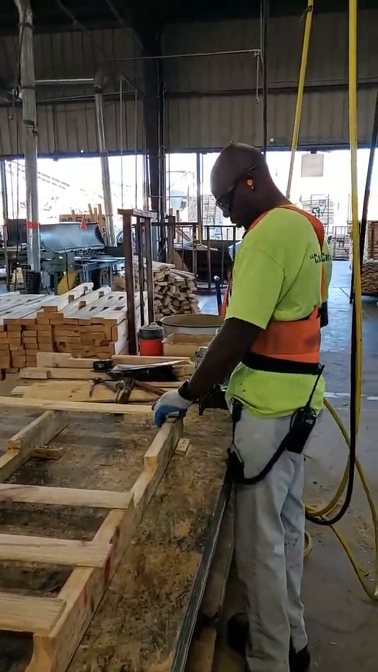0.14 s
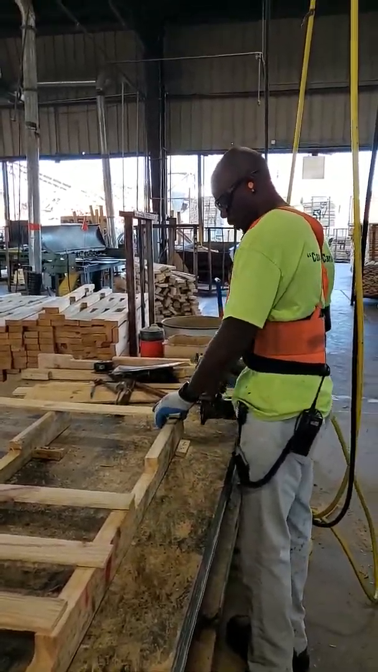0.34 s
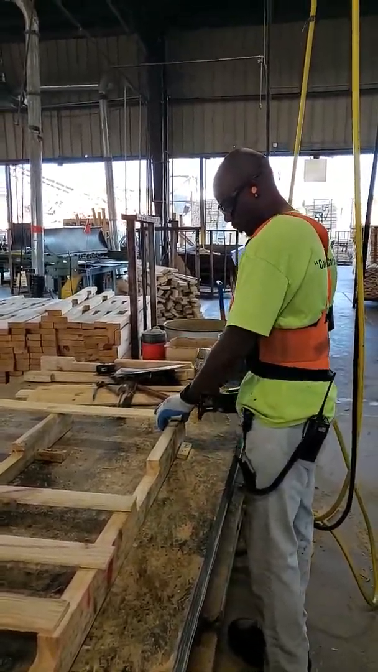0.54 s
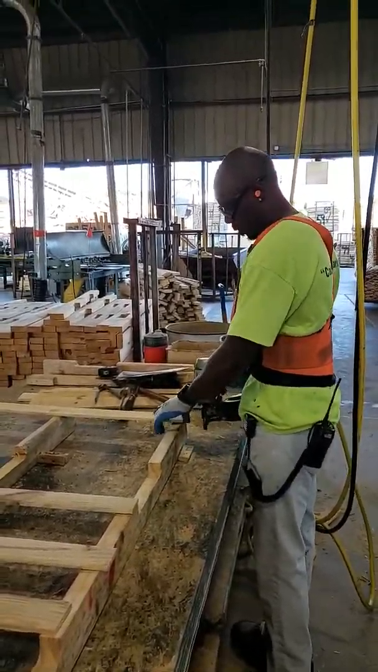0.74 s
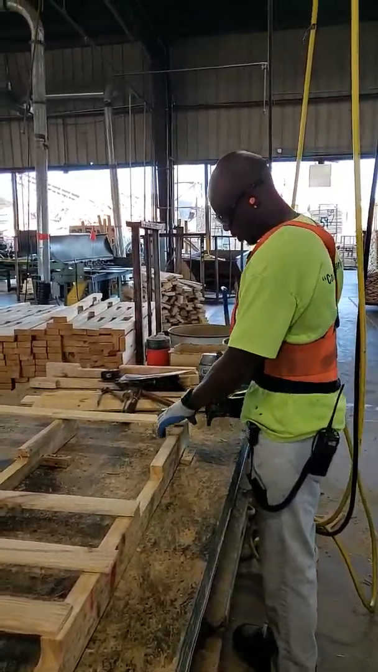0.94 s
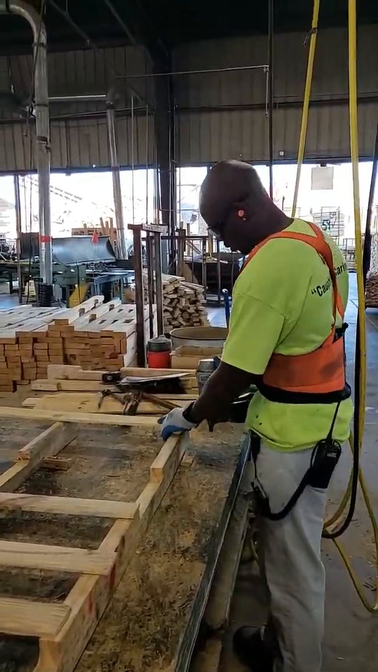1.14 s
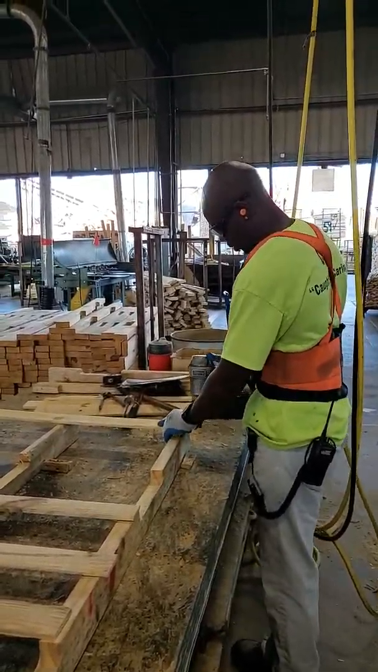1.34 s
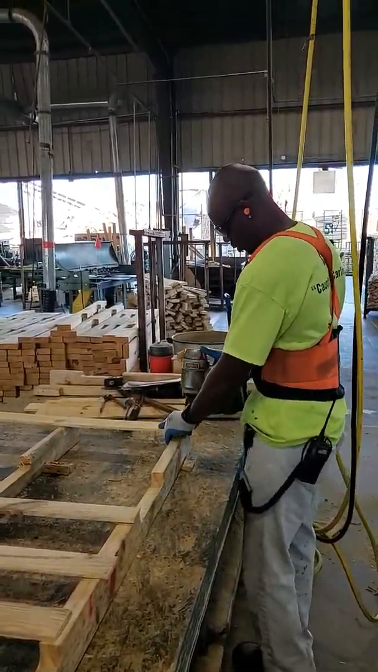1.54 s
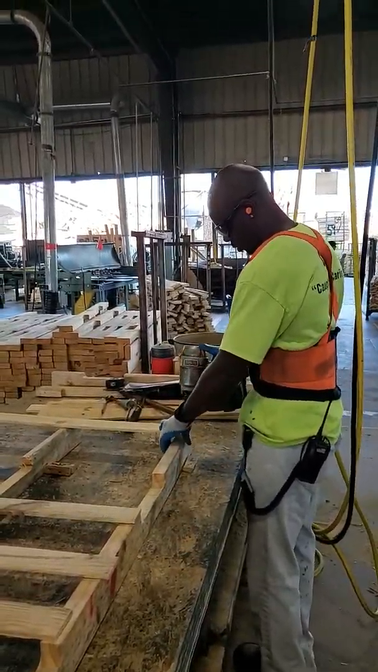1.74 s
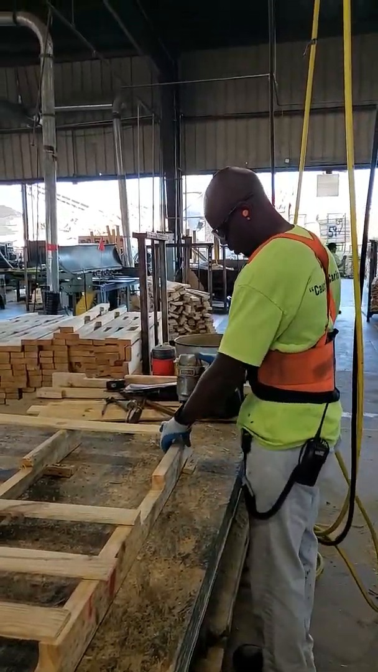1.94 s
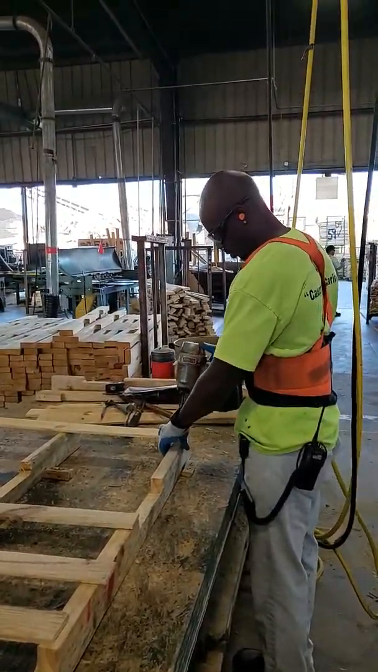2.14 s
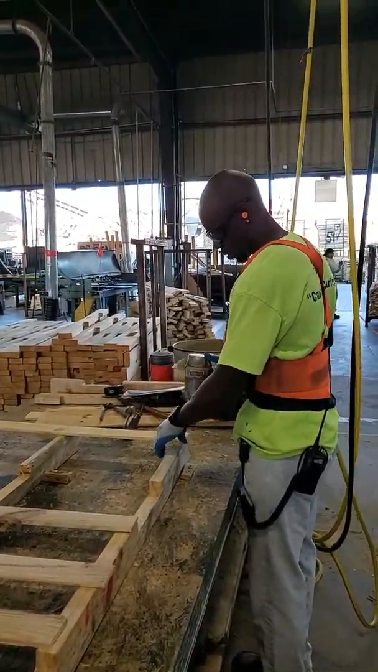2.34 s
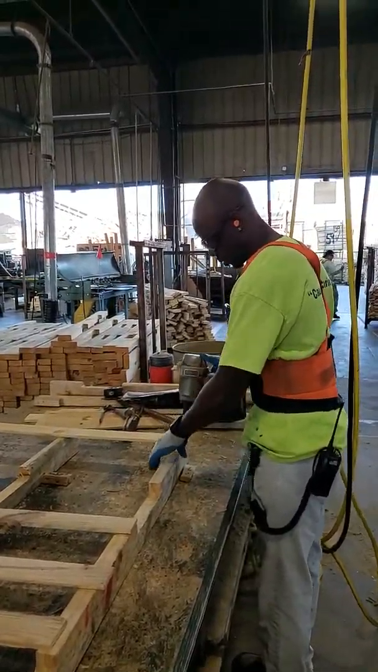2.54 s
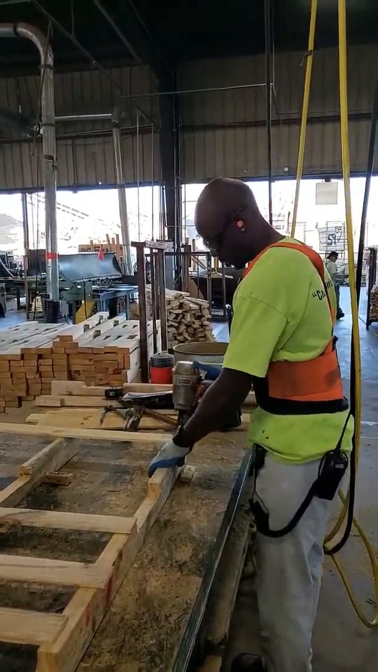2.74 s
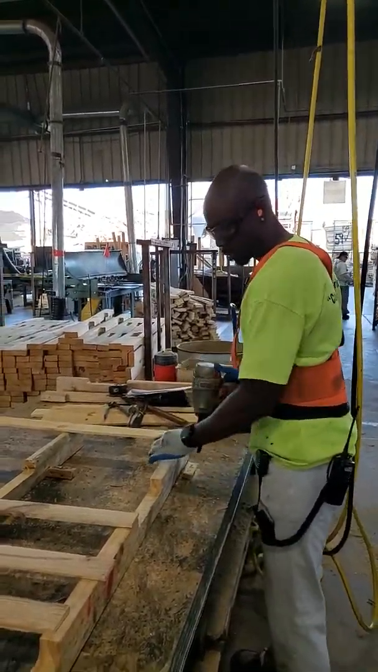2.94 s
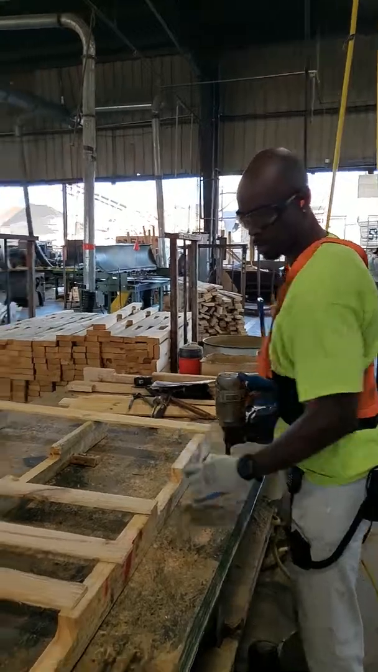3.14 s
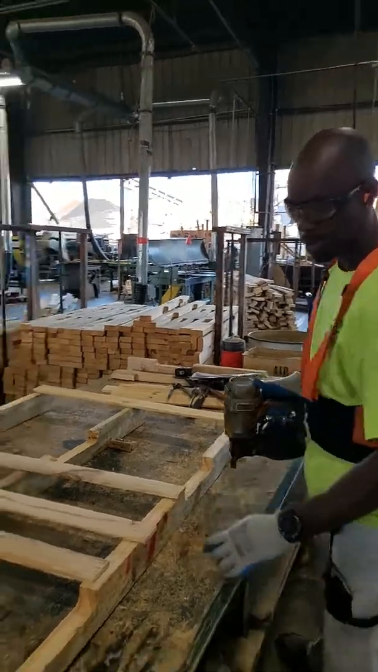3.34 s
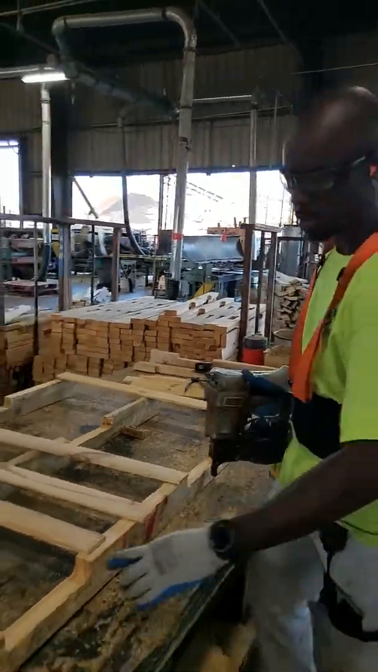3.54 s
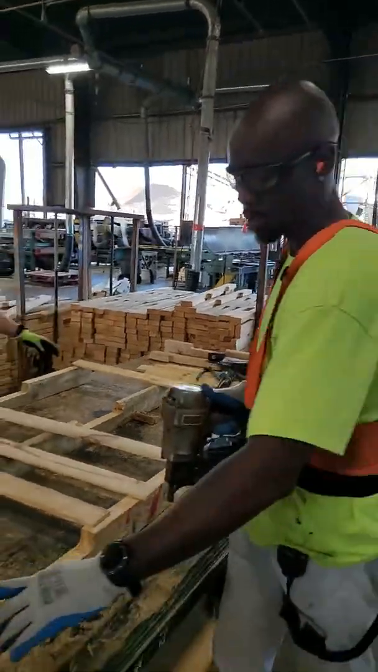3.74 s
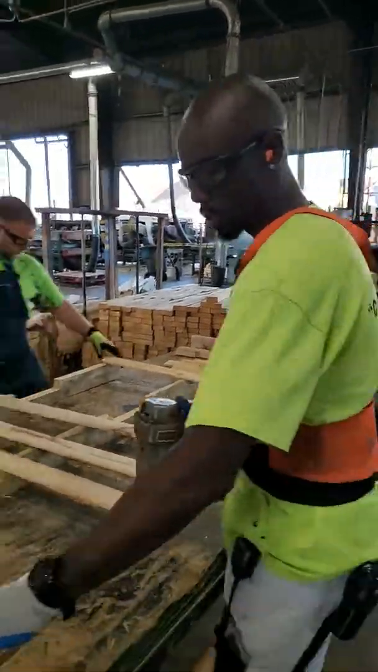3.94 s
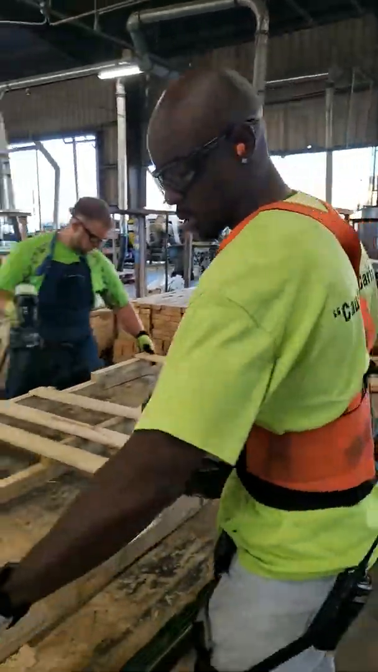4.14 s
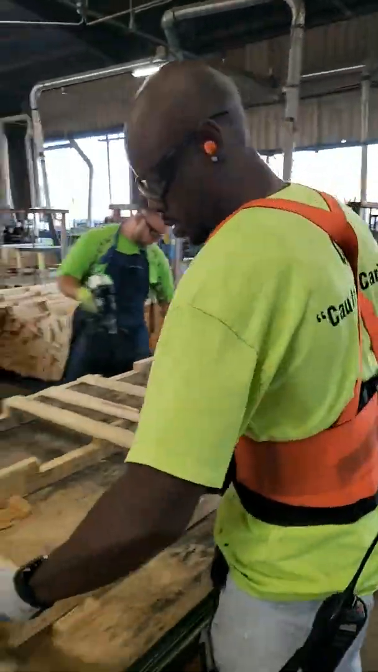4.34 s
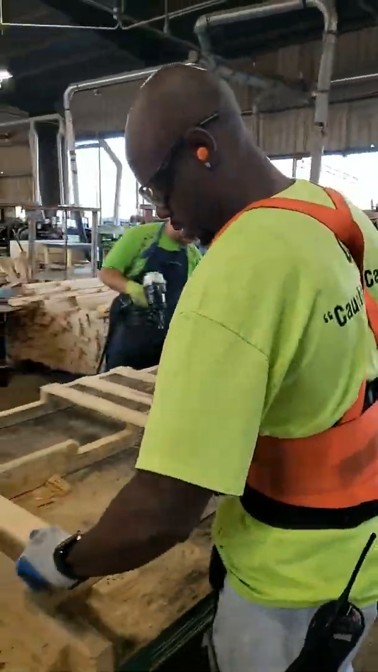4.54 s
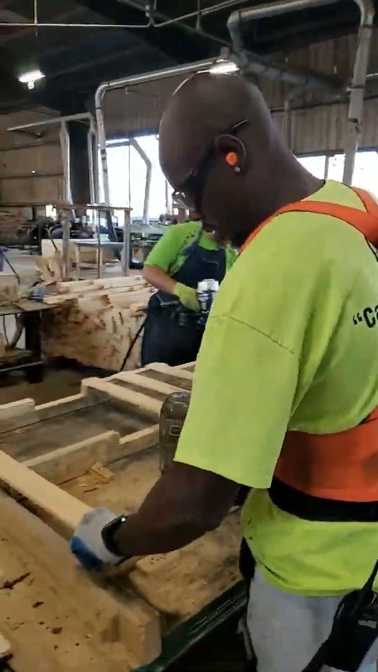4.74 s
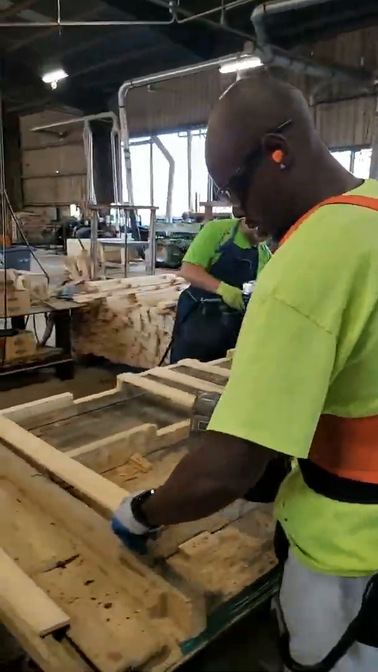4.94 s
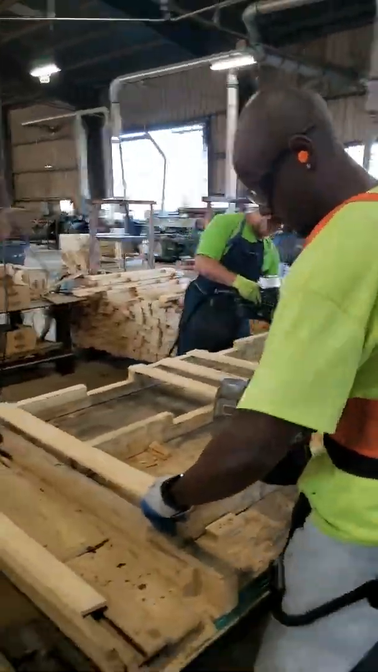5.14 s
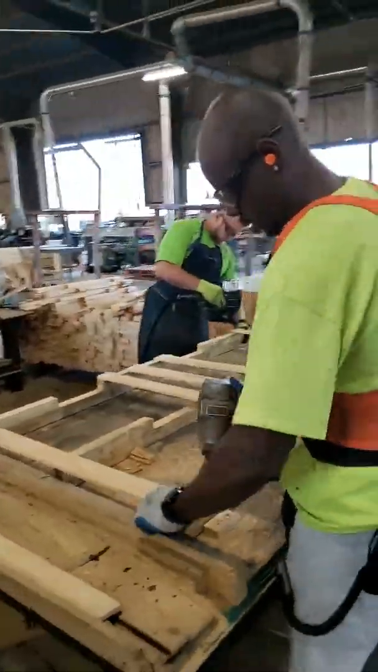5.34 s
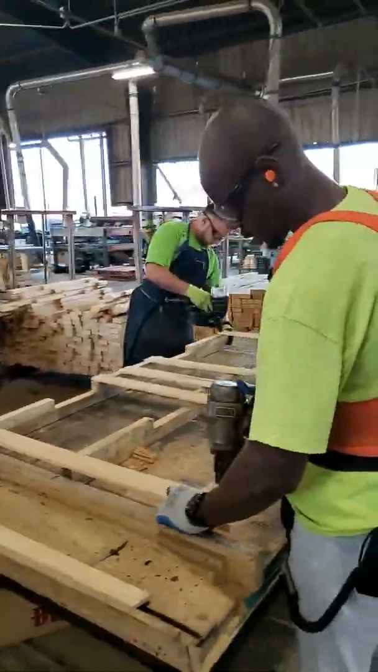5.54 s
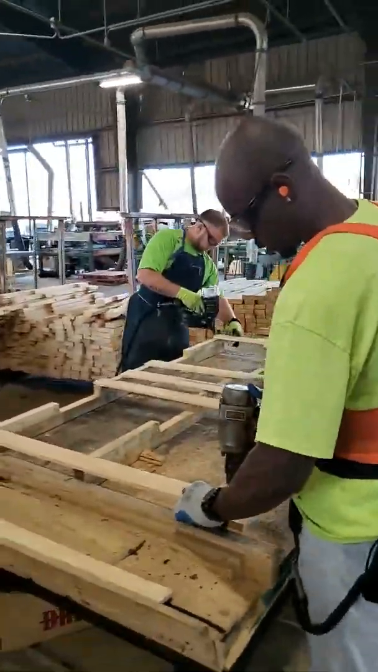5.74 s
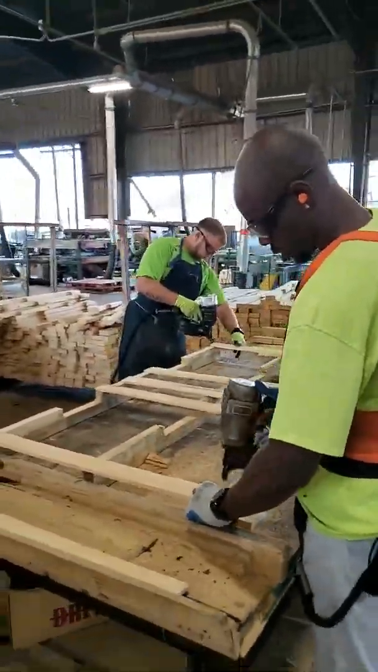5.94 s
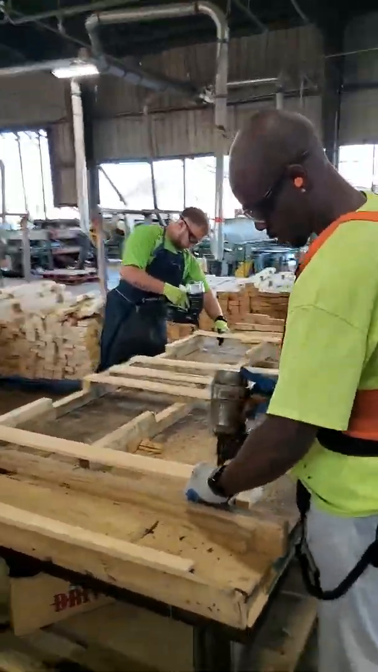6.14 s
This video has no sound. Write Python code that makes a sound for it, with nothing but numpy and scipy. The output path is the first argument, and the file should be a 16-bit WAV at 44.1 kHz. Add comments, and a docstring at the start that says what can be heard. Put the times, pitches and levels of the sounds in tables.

```python
"""Nail guns in a hall

Two pneumatic nail guns fire six nails into a timber frame in a large open hall.
Pops and knocks are pressure pushes, driver blows are decaying modes with noisy cracks, vented air is
shaped noise. Machines rumble far off as noise and wavering tones, and an air line leaks as steady hiss.
Sparse echoes make the hall, and the phone's gain control sinks under loud sound, then climbs back."""
import sys
import numpy as np
from scipy import signal
from scipy.io import wavfile
from scipy.ndimage import uniform_filter1d

SR = 44100
rng = np.random.default_rng(int(sys.argv[2]) if len(sys.argv) > 2 else 0)


def natural_amplitude(level_db):
    """Convert a level in decibels to a linear amplitude factor, elementwise."""
    exponent = np.asarray(level_db, float) / 20
    return 10 ** exponent


def master_out(mix):
    """Clip the mix to full scale and print it as 16-bit PCM to the path in sys.argv[1]."""
    frames = np.transpose(np.atleast_2d(mix))
    ceiling = np.clip(frames, -1, 1)
    pcm = np.round(ceiling * 32767).astype(np.int16)
    wavfile.write(sys.argv[1], SR, pcm)


N = 277389  # length in samples

# Likeness of the noisy parts of a shot at the two ports. Each row: frequency in Hz, correlation from -1 to 1.
SHOT_LIKENESS = [(500, 0.62), (2000, 0.4), (6000, 0.2), (14000, 1)]
# Low-pass corner that rounds off the front of a push. Columns: near gun in Hz, far gun in Hz.
FRONT_HZ = (2600, 4500)


def evened(x):
    """Normalization: scales a signal to an rms of 1."""
    return x / np.sqrt(np.mean(x ** 2) + 1e-20)


def read(points, hz):
    """Pitch scale: interpolates a table along a logarithmic frequency axis."""
    table_hz, value = np.transpose(points)
    return np.interp(np.log(hz + 1), np.log(table_hz + 1), value)


def add(mix, s, sound):
    """Superposition: adds a sound into the mix from s seconds on."""
    part = mix[round(s * SR):][:len(sound)]
    part += sound[:len(part)]


def wobble(width):
    """Random modulation: white noise averaged twice over width samples drifts slowly, with an rms of 1."""
    once = uniform_filter1d(rng.standard_normal(N), width)
    return evened(uniform_filter1d(once, width))


def noise(colour, likeness, patchy_db, size):
    """Turbulence: random short-time spectra with drifting patches, partly correlated between two ports."""
    hz = np.fft.rfftfreq(size, 1 / SR)
    a, b, c, d, patches = rng.standard_normal((4 * N // size + 5, len(hz), 5)).T
    patches = uniform_filter1d(patches, size=9, axis=0)
    patches = evened(uniform_filter1d(patches, size=9, axis=1))
    same = np.clip(read(likeness, hz), -1, 1)[:, None]
    left = a + 1j * b
    right = same * left + np.sqrt(1 - same ** 2) * (c + 1j * d)
    spectra = np.array([left, right]) * natural_amplitude(read(colour, hz)[:, None] + patchy_db * patches)
    return evened(signal.istft(spectra, nperseg=size, noverlap=3 * size // 4)[1][:, :N])


def leak():
    """Jet noise: steady escape of air, nearly unrelated at the ports, its direct share set by the phone."""
    # The leak as the phone moves. Each row: time in seconds, level in dB, left minus right in dB,
    # direct share of the power from 0 to 1.
    course = [(0, -42.5, -3, 0), (1.5, -45, -5, 0.44), (3.298, -41, -6, 0.45), (4.2, -41, -8.5, 0.44),
              (4.85, -42, -8, 0.9), (5.15, -37.5, -7.5, 1), (5.4, -35.5, -9, 0.93),
              (5.6, -37.5, -7.5, 0.72), (6.29, -43, -9, 0.56)]
    # Spectrum straight from the jet. Each row: frequency in Hz, relative density in dB per Hz.
    direct_colour = [(880, -63), (1500, -17.5), (2000, -11), (2440, -19), (3660, -17.5), (4330, -11.5),
                     (4640, -17.5), (5660, -9.5), (6560, -11), (7300, -20.5), (8920, -5.5), (11000, -6.5),
                     (12400, 7), (13500, -4), (14500, 3), (15400, -5), (16000, -42)]
    # Spectrum off the walls. Each row: frequency in Hz, relative density in dB per Hz.
    echoed_colour = [(880, -61), (1500, -9), (2080, -13.5), (2410, -6.5), (3520, -14), (6500, -5),
                     (7390, -8), (9650, -1.5), (10900, -5.5), (12100, 2), (14600, -0.5), (15400, 6),
                     (16000, -48)]
    likeness = [(1000, 0.0057), (16000, 0.0043)]  # (Hz, correlation)
    s, *columns = np.transpose(course)
    level_db, pan_db, direct = (np.interp(np.arange(N) / SR, s, c) for c in columns)
    near = noise(direct_colour, likeness, patchy_db=1.94, size=512)
    far = noise(echoed_colour, likeness, patchy_db=1.94, size=512)
    direct = np.clip(direct, 0, 1)
    hiss = np.sqrt(direct) * near + np.sqrt(1 - direct) * far  # powers add up to one
    return hiss * natural_amplitude(level_db + 0.37 * wobble(2700) + np.array([pan_db, -pan_db]) / 2)


def machines():
    """Rotating machinery: shaft orders share one wavering speed above a broadband rumble."""
    # Spectrum of the rumble. Each row: frequency in Hz, relative density in dB per Hz.
    rumble_colour = [(22, -44), (38, -5), (129, -7), (187, -16), (207, -11.5), (318, -17), (414, -20),
                     (449, -17.5), (1170, -24.5), (3390, -25), (5000, -25.5), (6500, -60), (11000, -120)]
    # Likeness of the rumble at the two ports. Each row: frequency in Hz, correlation from -1 to 1.
    likeness = [(60, 0.98), (240, 0.94), (950, 0.25), (3770, -0.3), (15000, -0.03)]
    # Shaft orders. Each row: mean frequency in Hz, rms level in dB about which it wavers.
    orders = [(43.5, -65.5), (89.5, -61), (134, -62.5), (177.5, -59.5)]
    t = np.arange(N) / SR
    turned = t + 0.01288 * np.cumsum(wobble(7130)) / SR  # integral of the relative speed
    hum = np.zeros(N)
    for hz, db in orders:
        hum += np.sqrt(2) * natural_amplitude(db + 3.45 * wobble(7700)) * np.sin(2 * np.pi * hz * turned)
    return natural_amplitude(-48) * noise(rumble_colour, likeness, patchy_db=1.15, size=2048) + hum


def blows():
    """Modal excitation: each strike favours some modes of gun, nail and frame; a noisy crack joins."""
    # Driver blows, bounces and, at 0.262 s, one faint far thud. Each row: start in seconds,
    # ring level in dB, favoured pitch in Hz, narrowness in dB per octave squared (sign ignored),
    # crack level in dB, factor on the ring times.
    strikes = [(0.262, -42, 640, 16, -67, 1), (0.815, -23.5, 2300, 8, -43, 0.75),
               (0.8583, -9.5, 2600, 24, -27, 1.1), (0.867, -16.5, 2400, 57, -32, 1.1),
               (0.868, -12, 1530, 75, -40, 1.7), (0.876, -12.5, 1510, 48, -21, 1.3),
               (0.908, -12, 2320, 34, -23.5, .9), (0.916, -16.5, 2870, 80, -31, 0.93),
               (1.977, -12.5, 2400, 15, -20, 1.36), (1.982, -12.5, 2300, 9, -18, 1.2),
               (1.986, -17, 1200, 2, -28, 0.63), (1.991, -16.5, 860, 15, -34, 0.48),
               (2.1705, -12, 2200, 22, -12, 1.5), (2.173, -14, 2420, 150, -18, 2.4),
               (2.174, -13.5, 1140, 84, -25, 2.6), (2.181, -16, 1230, 36, -17, 1.5),
               (2.189, -13.5, 1135, 160, -36, 1.6), (2.681, -16.5, 950, 13, -31, 1.4),
               (2.6842, -14.5, 960, 7, -14.5, 1.3), (2.692, -12, 780, 30, -20, 0.91),
               (2.698, -17.5, 735, 60, -27, 1.2), (2.71, -33, 2600, -1, -22, .6),
               (5.594, -21, 1200, 5, -18.5, 1.23), (5.599, -19, 1400, 8, -17.5, 1),
               (5.605, -25, 1250, 26, -33, 0.99), (5.611, -26.5, 1240, 24, -31, 0.96),
               (5.617, -19, 3000, 3, -18, 0.81), (5.621, -26, 995, 10, -31, 0.32),
               (6.212, -33, 260, 22, -28, 0.7), (6.2195, -19, 2200, 18, -21, 0.54),
               (6.2225, -18, 2500, 29, -27, 0.68)]
    # Modes of gun, nail and frame. Each row: frequency in Hz, relative level in dB,
    # time to fall 60 dB in seconds before the factor of the strike.
    modes = [(263, -5, 0.079), (520, -10, 0.026), (647, -2, 0.041), (735, 3.5, 0.043), (856, 1, 0.026),
             (1135, 3, 0.032), (1285, -1, 0.028), (1382, 4, 0.031), (1486, -1.5, 0.048), (1683, 1, 0.042),
             (1890, 4.5, 0.028), (2200, 2.5, 0.029), (2388, 0, 0.03), (2600, -2, 0.039), (2870, -3.5, 0.04),
             (3480, -18.5, 0.13), (4730, -20, 0.013), (1140, -33, .6), (1400, -35, .9), (1640, -28, 0.8),
             (2280, -22, 1)]
    # Spectrum of the crack. Each row: frequency in Hz, relative density in dB per Hz.
    crack_colour = [(180, -38), (300, -1.5), (2440, 6), (3640, -7.5), (4590, 2), (7320, -7), (9710, 3.5),
                    (10700, -40), (12100, 6), (15000, -15), (16000, -84)]
    rise_s, crack_t60 = 0.0011, 0.028  # seconds
    detune = 0.0162  # whole spread of a mode's frequency, as a share
    slip_turns = 0.35  # whole spread of left-right phase at 3 kHz, in cycles
    t = np.arange(SR // 2) / SR
    ring, crack = np.zeros((2, N)), np.zeros(N)
    hz, mode_db, t60 = np.transpose(modes)[:, :, None]
    chances = rng.random((len(strikes), 3, len(modes), 1))
    for (s, db, spot_hz, narrow_db, crack_db, lasts), chance in zip(strikes, chances):
        share_db = mode_db - abs(narrow_db) * np.log2(hz / spot_hz) ** 2
        # each strike detunes the modes a little and starts them at random phases
        turns = hz * (1 + detune * (chance[0] - 0.5)) * t + chance[1]
        fading = natural_amplitude(db + share_db - 60 * t / (lasts * t60)) * np.minimum(t / rise_s, 1)
        fading /= np.linalg.norm(natural_amplitude(share_db))
        # a wide frame: high modes reach the ports unevenly
        slip = slip_turns * (chance[2] - 0.5) * (hz / 3000) ** 2
        add(ring[0], s, (fading * np.sin(2 * np.pi * (turns + slip))).sum(axis=0))
        add(ring[1], s, (fading * np.sin(2 * np.pi * turns)).sum(axis=0))
        add(crack, s, natural_amplitude(crack_db - 60 * t[:4000] / crack_t60))
    return ring, crack * noise(crack_colour, SHOT_LIKENESS, patchy_db=0.5, size=256)


def push(swing_ms, front_hz):
    """Pressure pulse: a sharp front and ever slower, damped swings, low-passed at front_hz."""
    u = np.arange(2000) / SR * 1000 / swing_ms  # time in first swings
    swings = np.sin(np.pi * u ** 0.41) * np.exp(-0.3 * u)
    return signal.lfilter(*signal.butter(2, front_hz, fs=SR), swings)


def pops():
    """Sudden release: each valve sends out a pressure push and a decaying puff of air."""
    # Valve pops. Each row: start in seconds, push level in dB, puff level in dB, gun (0 near, 1 far),
    # samples taken off the left port's later delay for this push.
    releases = [(0.8452, -17.5, -25, 0, 5), (1.969, -15.5, -21, 1, 8), (2.1586, -20.5, -40, 0, 6),
                (2.1664, -16, -31, 0, 6), (2.674, -13, -48, 1, 10), (5.581, -22.5, -27.5, 0, 2),
                (5.5911, -15.5, -26.5, 0, 2), (6.2092, -16, -32, 1, 1)]
    # First swing of the push. Columns: near gun in ms, far gun in ms.
    swings_ms = (0.59, 0.14)
    pushes, puffs = np.zeros((2, N)), np.zeros(N)
    t = np.arange(4000) / SR
    for s, db, puff_db, gun, less_lag in releases:
        pop = natural_amplitude(db) * push(swings_ms[gun], FRONT_HZ[gun])
        add(pushes[0], s - less_lag / SR, pop)
        add(pushes[1], s, pop)
        add(puffs, s, natural_amplitude(puff_db - 60 * t / 0.03))  # 0.03 s to fall 60 dB
    return pushes, puffs


def jet():
    """Turbulent mixing: the noise of vented air, whose level sputters."""
    # Spectrum of vented air. Each row: frequency in Hz, relative density in dB per Hz.
    vent_colour = [(470, -9.5), (800, -11.5), (1590, -16), (2980, -7), (3470, -9), (4680, -5), (6650, -8),
                   (7360, -13.5), (9220, -2), (10800, -10.5), (12100, 0), (15000, 0), (16000, -56)]
    return noise(vent_colour, SHOT_LIKENESS, patchy_db=2.5, size=256) * natural_amplitude(1.5 * wobble(32))


def vents():
    """Blowdown: the exhaust envelope sags as the cylinder empties, then drops and fades once shut."""
    # Exhaust after the blows. Each row: opening in seconds, time open in seconds, first level in dB.
    exhausts = [(0.875, 0.018, -19), (1.996, 0.04, -20.5), (2.192, 0.023, -17), (2.718, 0.073, -16.5),
                (5.627, 0.05, -22.5), (6.233, 0.074, -26)]
    sag_db_per_s = -110
    rise_s, shut_s, shut_db, fade_t60 = 0.00053, 0.021, -4, 0.52  # times in seconds
    t, air = np.arange(SR // 2) / SR, np.zeros(N)
    for s, length, db in exhausts:
        shut = np.maximum(t - length, 0)
        level_db = db + sag_db_per_s * np.minimum(t, length)
        level_db += shut_db * np.minimum(shut / shut_s, 1) - 60 * shut / fade_t60
        add(air, s, np.minimum(t / rise_s, 1) * natural_amplitude(level_db))
    return air


def knocks():
    """Impact and rebound: the near gun's piston knocks back, then rebounds, as two inverted pushes."""
    # Piston knocks. Each row: start in seconds, knock level in dB, rebound level in dB.
    returns = [(0.898, -20, -20), (2.213, -16, -18.5), (5.647, -27.5, -24.5)]
    swing_ms, rebound_swing_ms, rebound_s = 1.5, 0.87, 0.00618
    pushes = np.zeros((2, N))
    for s, db, rebound_db in returns:
        for port in pushes:
            add(port, s, -natural_amplitude(db) * push(swing_ms, FRONT_HZ[0]))
            add(port, s + rebound_s, -natural_amplitude(rebound_db) * push(rebound_swing_ms, FRONT_HZ[0]))
    return pushes


def lead_ins():
    """Throttled flow: the far gun's hiss swells from just before its valve pops, then decays."""
    # Hisses of the far gun. Each row: start in seconds, length of the swell in seconds, level reached in dB.
    hisses = [(1.968, 0.0085, -51.5), (2.668, 0.017, -18.5), (6.205, 0.014, -29)]
    t, air = np.arange(SR // 2) / SR, np.zeros(N)
    for s, length, db in hisses:
        after = np.maximum(t - length, 0)
        add(air, s, np.minimum(t / length, 1) * natural_amplitude(db - 60 * after / 0.12))  # 0.12 s to fall 60 dB
    return air


def placed(shots):
    """Diffraction and resonance: delay and treble shadow at the left port, a resonance at the right."""
    # Where each shot stands. Each row: start in seconds, left delay in samples (rounded),
    # treble shadow on the left in dB, added resonance of the right port in dB.
    places = [(0.8, 11.5, -13, -32), (1.9, 10.5, -22, 8), (2.14, 12.2, -9, -33), (2.6, 11.5, -21, 6.5),
              (5.5, 6.5, -12, 4.5), (6.1, 6.6, -16, 12)]
    port_hz, port_q = 11580, 15.7
    edges = [0] + [round(p[0] * SR) for p in places[1:]] + [N]
    bass = signal.lfilter(*signal.butter(1, 4500, fs=SR), shots[0])
    treble = shots[0] - bass
    port = signal.lfilter(*signal.iirpeak(port_hz, port_q, fs=SR), shots[1])
    left, right = np.zeros(N), np.zeros(N)
    for (s, lag, shade_db, port_db), a, b in zip(places, edges, edges[1:]):
        left[a:b] = np.roll(bass[a:b] + natural_amplitude(shade_db) * treble[a:b], round(lag))
        right[a:b] = shots[1, a:b] + natural_amplitude(port_db) * port[a:b]
    return np.array([left, right])


def hall(x):
    """Reverberation: sparse echoes of random sign, each frequency band decaying at its own speed."""
    # Reverberation time. Each row: frequency in Hz, time to fall 60 dB in seconds.
    decay = [(200, 1.15), (1000, 1.74), (3000, 1.77), (8000, 0.97), (14000, 0.19)]
    bench_db, bench_t60 = 17, 0.038  # first echoes from bench and floor: dB over the tail, seconds
    taps = np.zeros((2, 2 * SR))
    slots = np.arange(100, 2 * SR - 20, 20)
    at = slots + rng.integers(0, 20, (2, len(slots)))  # one echo at a random place in every 20 samples
    np.put_along_axis(taps, at, rng.choice([-1., 1.], at.shape), 1)
    taps *= 1 + natural_amplitude(bench_db - 60 * np.arange(2 * SR) / SR / bench_t60)
    hz, t, z = signal.stft(taps, SR, nperseg=256)
    tail = signal.istft(z * natural_amplitude(-60 * t / read(decay, hz)[:, None]), SR, nperseg=256)[1]
    tail /= np.linalg.norm(tail[0])
    return natural_amplitude(-7) * signal.fftconvolve(x[None], tail, axes=1)[:, :N]


def scene():
    """Superposition: direct shots, their reverberation, the leak and the machines add linearly."""
    ring, crack = blows()
    pushes, puffs = pops()
    pushes = signal.lfilter(*signal.butter(2, 110, "high", fs=SR), pushes + knocks())
    body = pushes + ring
    noisy = crack + (puffs + vents() + lead_ins()) * jet()
    # rings, pops and knocks feed the hall less than the noisy air and cracks
    to_hall = natural_amplitude(-3.5) * body[1] + noisy[1]
    return placed(body + noisy) + hall(to_hall) + leak() + machines()


def gain_control(power_db, step):
    """Feedforward compression: gain falls fast under loud sound, waits, then climbs back ever faster."""
    boost_db, limit_db, margin_db = 17, -14, 5
    attack, hold = 0.0044, 0.38  # seconds
    climb_db = 5.0  # dB per second squared
    gain_db, now_db, quiet = np.zeros(len(power_db)), boost_db, hold
    for k, room_db in enumerate(limit_db - power_db):
        quiet = 0 if room_db < now_db + margin_db else quiet + step
        if room_db < now_db:
            now_db += (room_db - now_db) * step / attack
        now_db = min(now_db + climb_db * max(quiet - hold, 0) * step, boost_db)
        gain_db[k] = now_db
    return gain_db


def top_cut(x):
    """Nothing passes above the cut-off."""
    return signal.sosfilt(signal.butter(12, 16600, fs=SR, output="sos"), x)


def record(dry):
    """Level detection: the mean power of the last 5 ms steers the gain in steps of 1 ms; peaks clip."""
    hop = 44  # samples
    power = uniform_filter1d((dry ** 2).mean(axis=0), size=220, origin=109)[::hop]
    gain_db = gain_control(10 * np.log10(abs(power) + 1e-12), hop / SR)
    smooth_db = np.interp(np.arange(N), np.arange(len(gain_db)) * hop, gain_db)
    mix = np.clip(dry * natural_amplitude(smooth_db), -1, 1)
    return top_cut(mix)


dry = scene()
out = record(dry)
master_out(out)
```